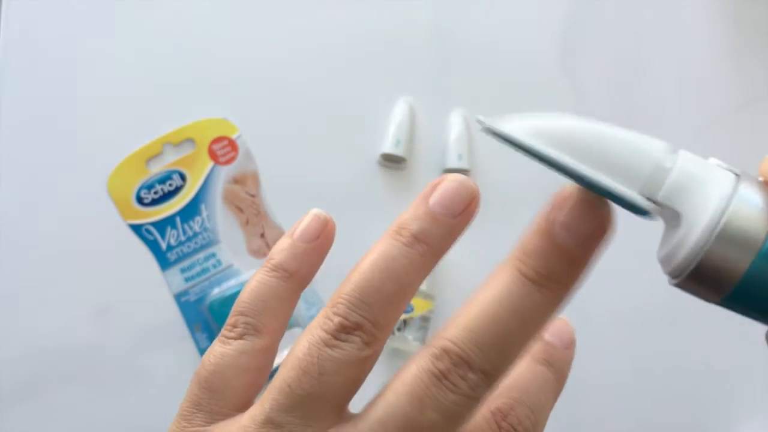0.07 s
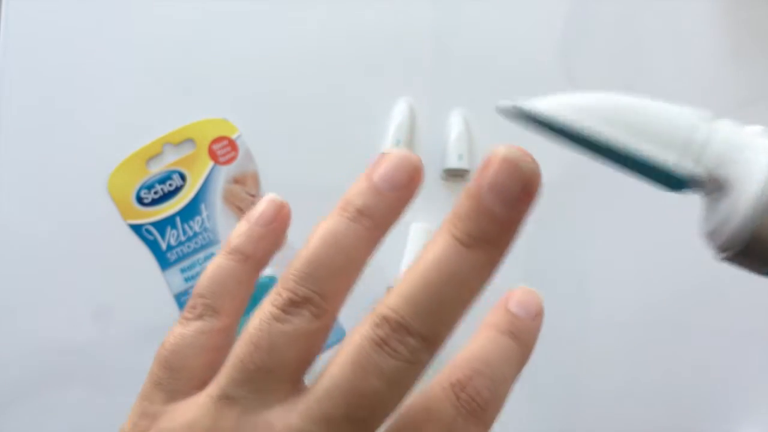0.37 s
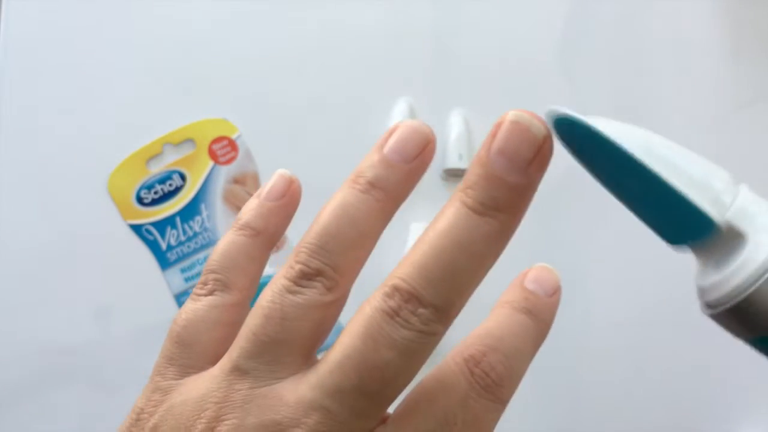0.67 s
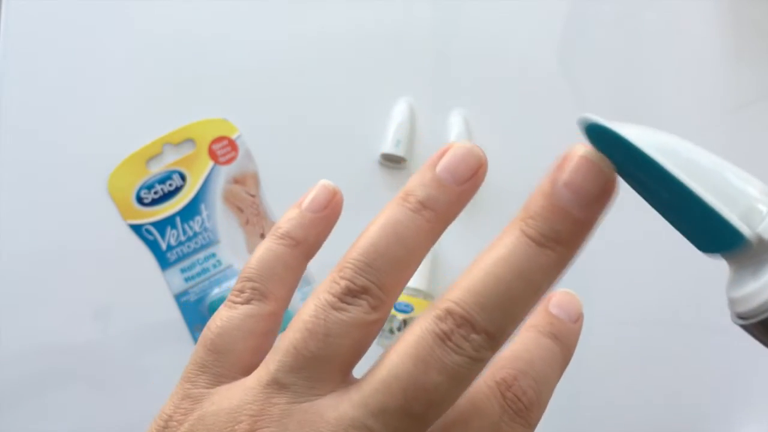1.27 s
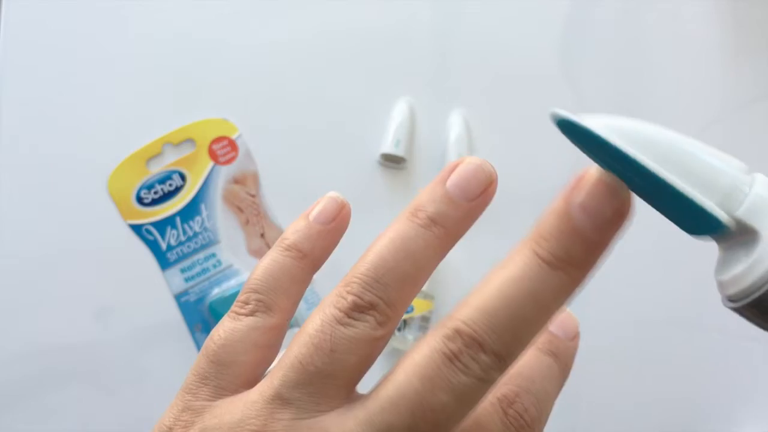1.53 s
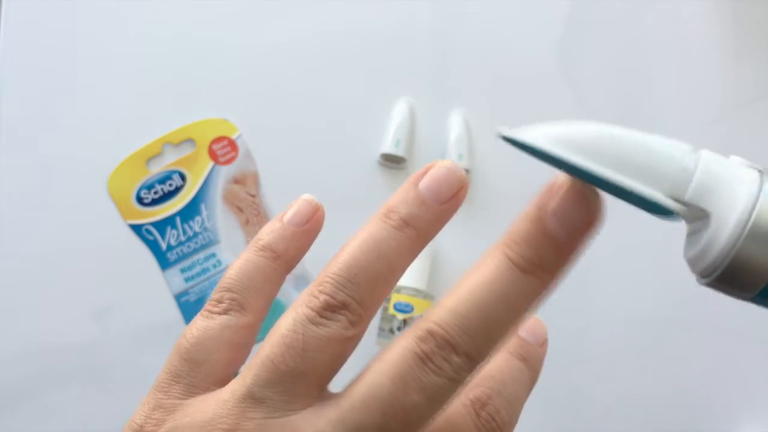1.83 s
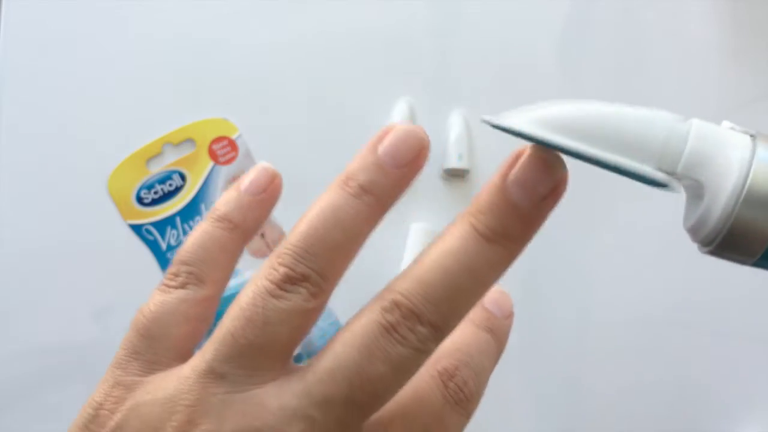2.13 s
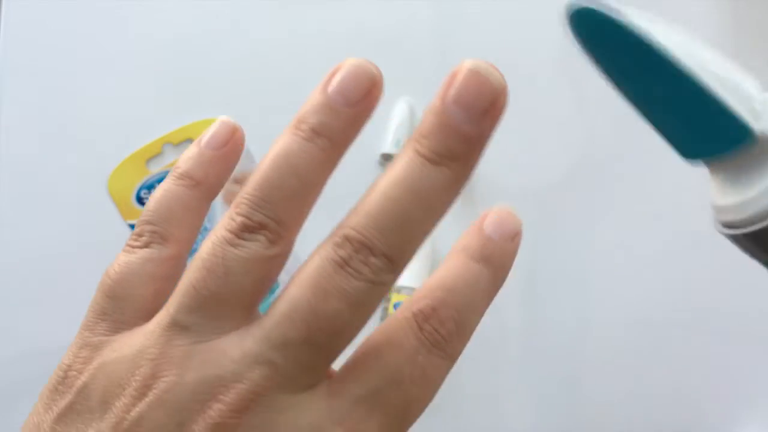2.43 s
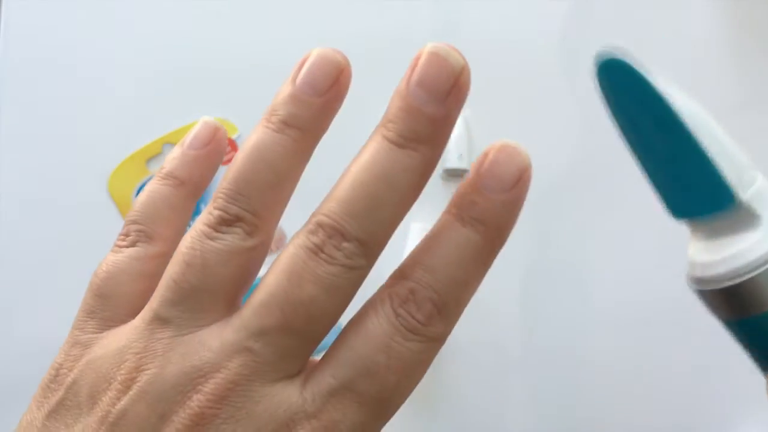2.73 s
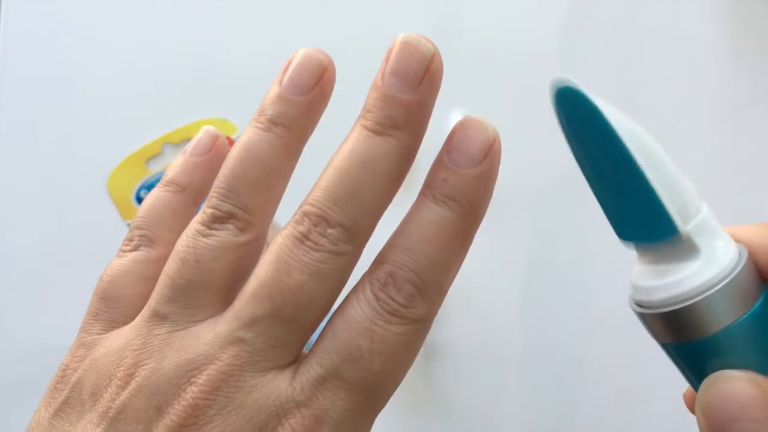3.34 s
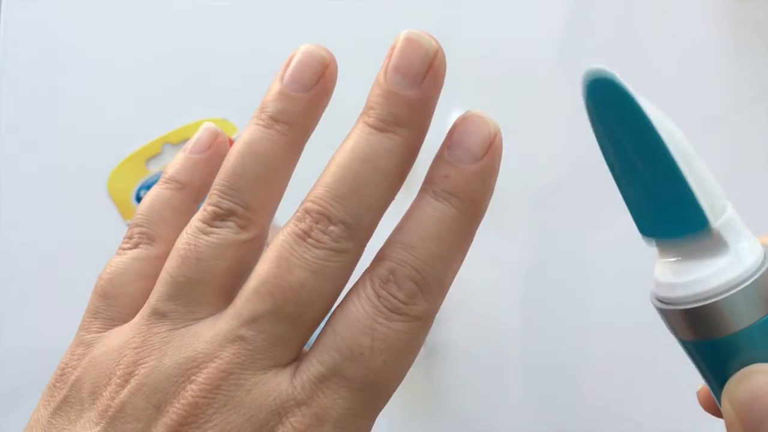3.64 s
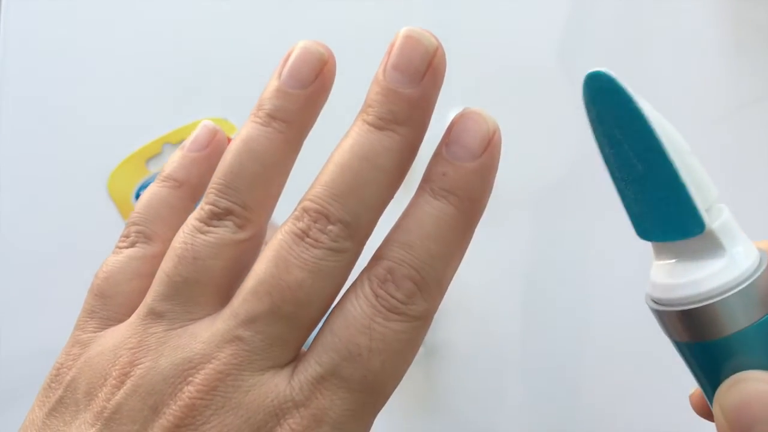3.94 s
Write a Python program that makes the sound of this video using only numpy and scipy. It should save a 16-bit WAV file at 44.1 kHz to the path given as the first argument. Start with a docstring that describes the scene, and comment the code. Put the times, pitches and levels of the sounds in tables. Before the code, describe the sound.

An electric nail file whines and rattles, slowing against a fingernail, then clicks off.

```python
"""A throbbing whine and a plastic rattle, close by in a quiet room: a battery nail file is running.
A 13-tooth pinion drives a 32-tooth crank wheel; the periodic meshing gives the whine, and the tooth
impacts excite the housing. The motor sags whenever the pad rasps on a nail, with thin squeals and one
scrape, and hands rub on the handle. The switch clicks off, the gears coast and fall silent, and the
room rings out over faint low hums."""
import sys
import numpy as np
from scipy import signal
from scipy.fft import rfft, irfft
from scipy.io import wavfile

SR = 44100
rng = np.random.default_rng(int(sys.argv[2]) if len(sys.argv) > 2 else 0)


def output_pcm(signal):
    """Save a mono or channel-first signal as 16-bit PCM at the path in sys.argv[1].

    Samples are clipped to [-1, 1] before scaling.
    """
    pcm = np.clip(np.atleast_2d(signal).T, -1, 1) * 32767
    wavfile.write(sys.argv[1], SR, np.round(pcm).astype(np.int16))


N = 176400
T = np.arange(N) / SR

# Tooth-passing frequency, low while the pad presses on the nail: t/s, f/Hz
MESH_RATE = [(0, 1372), (.22, 1314), (.32, 1606), (.44, 1754), (.55, 1775), (.72, 1777), (.79, 1741),
             (.93, 1772), (1.04, 1772), (1.18, 1680), (1.33, 1537), (1.52, 1478), (1.72, 1410),
             (2.04, 1386), (2.17, 1505), (2.27, 1669), (2.39, 1766), (2.56, 1784), (3.1, 1778),
             (3.59, 1765)]
# Uneven tooth pressure around the wheel: swings per turn, depth, lag/rad, offset/cycles
CRANK_LOAD = [(1, 0.59, 0.23, 0), (2, 0.45, -0.2, 0.31), (4, .12, -0.046, 0.62), (5, 0.21, 0.046, 0.61),
              (6, 0.13, 0.048, .2)]
# Gear whine: t/s, then level/dB of mesh tone, odd overtones, even overtones, half tones
WHINE_LEVELS = [(0, -65, -71, -63, -62), (.23, -58, -64, -62, -77), (.42, -54, -60, -64, -76),
                (.7, -51.5, -59, -69, -68), (.83, -49, -57, -63, -68), (1.05, -50.5, -57.5, -61, -72),
                (1.3, -56.5, -67, -65, -60), (1.72, -55.5, -75, -62, -64), (1.95, -62, -79, -69.5, -79),
                (2.2, -50.5, -70, -62, -52), (2.45, -47, -68, -57, -56), (3.05, -45.5, -64, -61, -56),
                (3.35, -50, -66.5, -62, -67), (3.59, -49.5, -68, -57, -62)]
# Partials of the whine: multiple of the mesh frequency, relative level/dB
ODD_OVERTONES = [(3, 2.5), (5, -7.5), (7, -2.5)]
EVEN_OVERTONES = [(2, -0.5), (4, -2.5), (6, -11.5), (8, 2)]
HALF_TONES = [(.5, -6.5), (1.5, -2)]
# Narrow passbands of the housing that let the odd overtones out: f/Hz, relative level/dB
HOUSING_PASSBANDS = [(3800, -2), (4600, -10), (5050, 0.5), (5400, -0.5), (5700, -14), (8000, -15),
                     (8750, 0.5), (9500, -14), (11900, -14), (12450, 3), (12900, -12)]
# Running noise: t/s, then relative level/dB of rattle, treble hiss, top hiss
RUNNING_LEVELS = [(0.0, -51, -59.5, -58), (0.19, -54.5, -62, -61), (0.55, -51, -56.5, -58.5),
                  (1.06, -51.5, -58.5, -55.5), (1.12, -53, -58, -61), (1.17, -51, -60, -58),
                  (1.36, -53, -60.5, -57), (1.92, -53, -63, -61), (1.97, -53, -63.5, -60),
                  (2.43, -52, -57.5, -56), (2.48, -51, -58, -59), (3.09, -51, -57.5, -60.5),
                  (3.54, -52.5, -58, -58), (3.57, -53.5, -59, -58)]
# Spectra of the plastic housing and the two bands of sliding hiss: f/Hz, relative level/dB
HOUSING_SPECTRUM = [(100, -10.5), (240, -5), (330, -11.5), (480, -11.5), (650, -10), (830, -0.5),
                    (1100, -6.5), (1450, -0.5), (1900, 2), (2300, -1.5), (2650, 2), (3050, -3.5),
                    (3800, -5), (4600, -11.5), (5300, -13.5), (6200, -28), (16000, -56)]
TREBLE_HISS_SPECTRUM = [(1000, -40), (4500, -1), (5800, -2.5), (7100, 0.5), (8000, -0.5), (9500, -3),
                        (11200, -4), (13000, -10), (16000, -13)]
TOP_HISS_SPECTRUM = [(3000, -36), (10500, -36), (12000, -6.5), (13200, -1), (14300, -1), (15500, -5),
                     (17000, -11.5)]
# Spectrum of the room air: f/Hz, relative level/dB
AIR_SPECTRUM = [(15, -40), (25, -12), (55, -3), (75, -8.5), (156, -14.5), (193, -18), (297, -15),
                (410, -27.5), (631, -16), (703, -28), (15500, -32.5)]
# Low hums that swell and fade: f/Hz, centre t/s, half-width/s, level/dB
ROOM_HUMS = [(141.5, 0.87, 0.41, -62.5), (141.5, 0.39, 0.071, -60), (81.4, 1.34, 0.73, -62.5),
             (84, 2.18, 0.14, -65), (80, 2.7, 0.65, -70), (49.93, 2.8, 0.4, -69.5), (50, 3.95, 0.34, -64.5),
             (223.4, 3.168, 0.972, -71)]
# The pad sings thinly on the nail: centre t/s, half-width/s, f/Hz, level/dB
PAD_SQUEALS = [(0.023, 0.18, 3910, -57.5), (1.5, 0.23, 4260, -65.5), (1.791, 0.11, 3930, -68)]
# The hands shift on the handle: centre t/s, half-width/s, level/dB
HAND_RUBS = [(0.31, 0.15, -60.5), (2.802, 0.23, -64.5)]
# Spectrum of skin rubbing: f/Hz, relative level/dB
RUB_SPECTRUM = [(90, -20), (190, -3), (250, 0.5), (330, -11), (410, -6.5), (600, -24), (2000, -52)]
# The pad catches the edge of the nail: centre t/s, half-width/s, level/dB
EDGE_SCRAPES = [(1.183, .07, -50.5)]
# Spectrum of grit on the nail: f/Hz, relative level/dB
SCRAPE_SPECTRUM = [(500, -28), (2000, -6), (3400, 6), (6000, -11), (11500, -11), (13200, -3), (14400, 4),
                   (16000, -12)]
# Touch, snap and bounce of the switch contacts: t/s, relative level/dB
SWITCH_IMPACTS = [(3.596, -38), (3.5977, -23.5), (3.5987, -34.5), (3.5987, -39)]
# Normal modes of the switch: f/Hz, relative level/dB, T60/s
SWITCH_MODES = [(900, -25, 0.027), (1730, -21, 0.014), (4835, -28, 0.0046), (6970, 4.5, 0.004),
                (7614, -5, .005), (8300, -13, 0.0046), (8800, -17, 0.0044), (12100, -4, 0.006),
                (14200, -6, 0.0047), (15000, -4, 0.0035)]

PINION_TEETH, WHEEL_TEETH, PINION_DEPTH = 13, 32, 0.38
UNLOADED_MESH_HZ, SPEED_WANDER, LOAD_WANDER = 1783, 0.0005, 0.03
TOOTH_JITTER_RAD, LOAD_JITTER_RAD, OVERTONE_JITTER_RAD, HALF_JITTER_RAD = 0.092, 2, 0.24, 1.67
WHINE_FLICKER_DB, LOAD_TILT_DB = 1.65, 12  # the tilt is per multiple at full stall
OFF_S, COAST_TAU_S, WHINE_TAU_S, RATTLE_FADE_DB_PER_S = 3.61, 0.4, 0.013, 86
WHINE_ROOM_DB, RASP_ROOM_DB, CLICK_ROOM_DB = -17, -5, -2.5


def amp(db):
    """Amplitude ratio of a level in decibels."""
    return 10 ** (np.asarray(db) / 20)


def unit(x):
    """Normalisation to rms 1."""
    return x / np.sqrt(np.mean(x ** 2))


def curve(table, column):
    """Linear interpolation of one table column in time."""
    rows = np.array(table)
    return np.interp(T, rows[:, 0], rows[:, column])


def swell(centre_s, half_width_s):
    """Gaussian envelope, down to 1/e one half-width from its centre."""
    return np.exp(-((T - centre_s) / half_width_s) ** 2)


def noise():
    """Gaussian white noise."""
    return rng.standard_normal(N)


def colour(x, spectrum):
    """Spectral shaping by (f/Hz, level/dB) points; rms 1."""
    hz, db = np.array(spectrum).T
    freq = np.maximum(np.fft.rfftfreq(N, 1 / SR), 1)
    gain = amp(np.interp(np.log(freq), np.log(hz), db))
    return unit(irfft(rfft(x) * gain, N))


def wander(rate_hz):
    """Random fluctuation: noise low-passed at the given rate; rms 1."""
    freq = np.fft.rfftfreq(N, 1 / SR)
    return unit(irfft(rfft(noise()) / (1 + (freq / rate_hz) ** 4), N))


def gear_drive():
    """Gear kinematics: the mesh rate integrates to teeth passed; rotation varies pressure and lag."""
    mesh_hz = curve(MESH_RATE, column=1)
    load = np.clip(1 - mesh_hz / UNLOADED_MESH_HZ, 0, 1)
    unsteadiness = 1 + (SPEED_WANDER + LOAD_WANDER * load) * wander(15)
    coast = np.exp(-np.maximum(T - OFF_S, 0) / COAST_TAU_S)
    teeth = np.cumsum(mesh_hz * unsteadiness * coast) / SR
    pressure = 1 + PINION_DEPTH * np.cos(2 * np.pi * teeth / PINION_TEETH)
    lag = 0
    for swings, depth, lag_rad, offset in CRANK_LOAD:
        angle = 2 * np.pi * (swings * teeth / WHEEL_TEETH + offset)
        pressure += depth * np.cos(angle)
        lag += lag_rad * np.sin(angle)
    return teeth, load, pressure, lag


def gear_whine(teeth, load, pressure, lag):
    """Amplitude and phase modulation: the mesh throbs with the crank, rougher and duller under load."""
    phase = 2 * np.pi * teeth + (TOOTH_JITTER_RAD + LOAD_JITTER_RAD * load) * wander(160)

    def partials(table, jitter_rad):
        """Superposition of mesh partials, each with its own phase jitter and flicker."""
        out = 0
        for multiple, db in table:
            chatter = jitter_rad * wander(120)
            tilt_db = LOAD_TILT_DB * load * (multiple - 4)  # pivots on the fourth harmonic
            gain = amp(db + WHINE_FLICKER_DB * wander(30) - tilt_db)
            out += gain * np.sin(multiple * (phase + chatter))
        return unit(pressure * out)

    fundamental = unit(pressure * np.sin(phase) + lag * np.cos(phase))
    fundamental *= amp(WHINE_FLICKER_DB * wander(35))
    odd = colour(partials(ODD_OVERTONES, OVERTONE_JITTER_RAD), HOUSING_PASSBANDS)
    even = partials(EVEN_OVERTONES, OVERTONE_JITTER_RAD)
    halves = partials(HALF_TONES, HALF_JITTER_RAD)
    layers = enumerate([fundamental, odd, even, halves], start=1)
    return sum(layer * amp(curve(WHINE_LEVELS, column)) for column, layer in layers)


def gear_rattle(teeth, pressure, wear_db=2.5, scatter_db=2.5, rattle_throb=0.16, hiss_throb=0.14):
    """Impact excitation and friction: each tooth knocks the housing; flanks and pad hiss as they slide."""
    impacts = np.flatnonzero(np.diff(np.floor(teeth)))
    tooth = np.arange(len(impacts))
    wheel_wear = rng.standard_normal(WHEEL_TEETH)[tooth % WHEEL_TEETH]
    pinion_wear = rng.standard_normal(PINION_TEETH)[tooth % PINION_TEETH]
    force = amp(wear_db * unit(wheel_wear + pinion_wear) + scatter_db * noise()[tooth])
    knocks = np.zeros(N)
    knocks[impacts] = force - force.mean()
    shake = (unit(knocks) + noise()) * (1 + rattle_throb * (pressure - 1))
    slide = (unit(knocks) * amp(-11) + noise()) * (1 + hiss_throb * (pressure - 1))
    rattle = colour(shake, HOUSING_SPECTRUM) * amp(curve(RUNNING_LEVELS, column=1) + 0.5)
    treble_hiss = colour(slide, TREBLE_HISS_SPECTRUM) * amp(curve(RUNNING_LEVELS, column=2) - 2)
    top_hiss = colour(slide, TOP_HISS_SPECTRUM) * amp(curve(RUNNING_LEVELS, column=3) - 2.5)
    return rattle + treble_hiss + top_hiss


def room_background(air_db=-63):
    """Ambient noise: broadband room air, and low hums that waver in amplitude and phase."""
    out = amp(air_db) * colour(noise(), AIR_SPECTRUM)
    for hz, centre_s, half_width_s, db in ROOM_HUMS:
        envelope = amp(db + 1.6 * wander(3.6)) * swell(centre_s, half_width_s)
        out += envelope * unit(np.sin(2 * np.pi * hz * T + 0.26 * wander(6.2)))
    return out


def room_echo(x, low_t60_s=0.7, high_t60_s=0.35, crossover_hz=4000, first_echo_s=0.006):
    """Reverberation: the diffuse field of a small room decays exponentially, the treble sooner."""
    tail = np.zeros(N)
    for side, t60 in [("low", low_t60_s), ("high", high_t60_s)]:
        band = signal.sosfilt(signal.butter(2, crossover_hz, side, fs=SR, output="sos"), noise())
        tail += band * amp(-60 * T / t60) * (T > first_echo_s)
    return signal.fftconvolve(x, tail / np.sqrt(np.sum(tail ** 2)))[:N]


def pad_squeal(stroke, half_band_hz=64):
    """Friction-driven resonance: a narrow band sings on the nail, pulsing with the strokes."""
    out = np.zeros(N)
    for centre_s, half_width_s, hz, db in PAD_SQUEALS:
        phasor = wander(half_band_hz) + 1j * wander(half_band_hz)
        ring = np.real(phasor * np.exp(2j * np.pi * hz * T))
        out += amp(db) * swell(centre_s, half_width_s) * unit(ring * (1 + stroke))
    return out


def hand_rub():
    """Sliding friction: skin on the handle gives soft swells of low noise."""
    envelope = sum(amp(db) * swell(centre_s, half_width_s) for centre_s, half_width_s, db in HAND_RUBS)
    return colour(noise(), RUB_SPECTRUM) * envelope


def edge_scrape(stroke, grain_db=4):
    """Abrasion: grit catches the edge of the nail and gives grainy noise, pulsing with the strokes."""
    grit = noise() * amp(grain_db * wander(1500)) * stroke
    envelope = sum(amp(db) * swell(centre_s, half_width_s) for centre_s, half_width_s, db in EDGE_SCRAPES)
    return colour(grit, SCRAPE_SPECTRUM) * envelope


def switch_click(ring_db=-5, crack_db=-6, crack_tau_s=0.0016):
    """Damped free vibration: each contact gives a short crack and rings the modes of the plastic."""
    out = np.zeros(N)
    for start_s, impact_db in SWITCH_IMPACTS:
        age = np.maximum(T - start_s, 0)
        ring = sum(amp(db - 60 * age / t60) * np.sin(2 * np.pi * hz * age) for hz, db, t60 in SWITCH_MODES)
        crack = noise() * np.exp(-age / crack_tau_s)
        out += amp(impact_db) * (amp(ring_db) * ring + amp(crack_db) * crack) * (T >= start_s)
    return out


def scene():
    """Superposition of direct sound, reverberation and background, the same in both ears."""
    teeth, load, pressure, lag = gear_drive()
    since_off = np.maximum(T - OFF_S, 0)
    stroke = np.sin(2 * np.pi * teeth / WHEEL_TEETH) ** 2  # two pad strokes per turn of the crank
    whine = gear_whine(teeth, load, pressure, lag) * np.exp(-since_off / WHINE_TAU_S)
    rattle = gear_rattle(teeth, pressure) * amp(-RATTLE_FADE_DB_PER_S * since_off)
    rasp = rattle + edge_scrape(stroke) + pad_squeal(stroke)
    click = switch_click()
    echo = room_echo(amp(WHINE_ROOM_DB) * whine + amp(RASP_ROOM_DB) * rasp + amp(CLICK_ROOM_DB) * click)
    mono = whine + rasp + click + echo + hand_rub() + room_background()
    return np.array([mono, mono])


def record(dry, cutoff_hz=15680):
    """Band limiting: a steep elliptic low-pass removes the highest treble."""
    return signal.sosfilt(signal.ellip(10, 0.1, 80, cutoff_hz, fs=SR, output="sos"), dry)


dry = scene()
out = record(dry)
output_pcm(out)
```